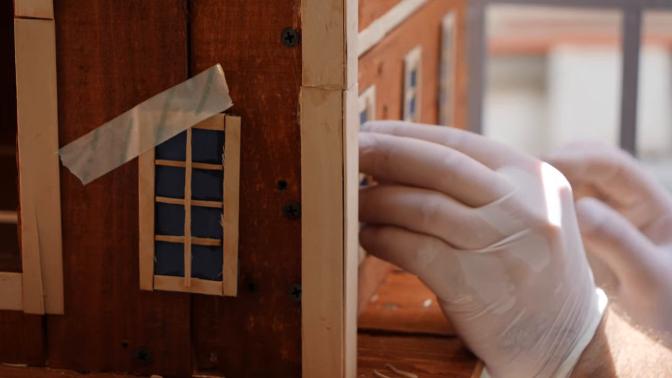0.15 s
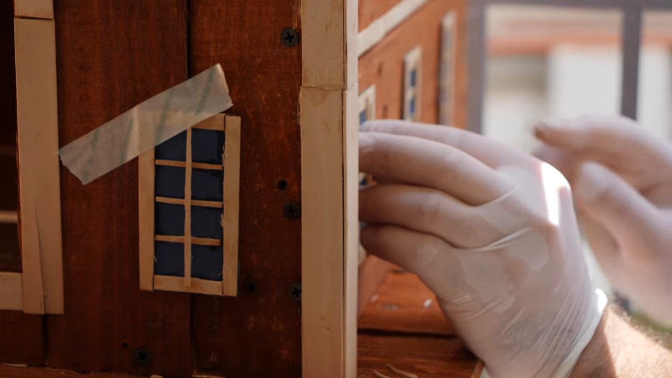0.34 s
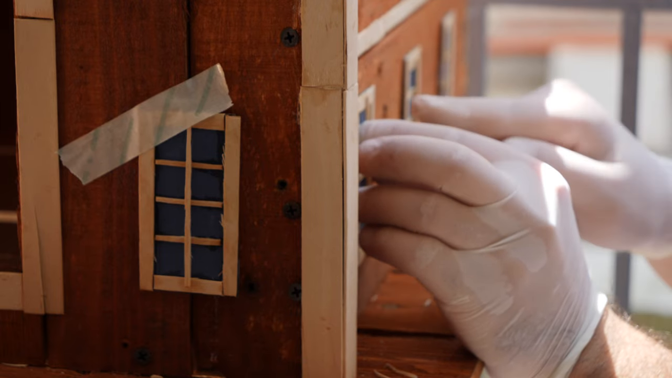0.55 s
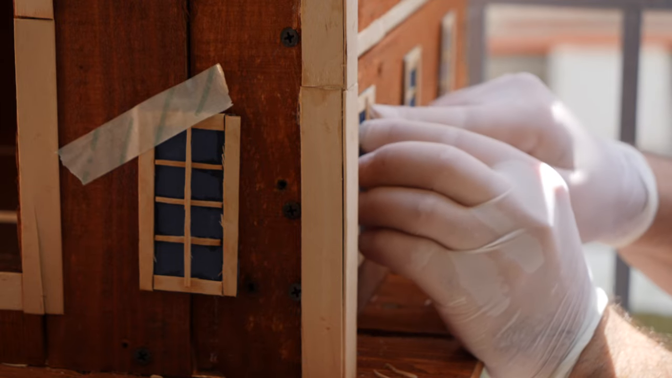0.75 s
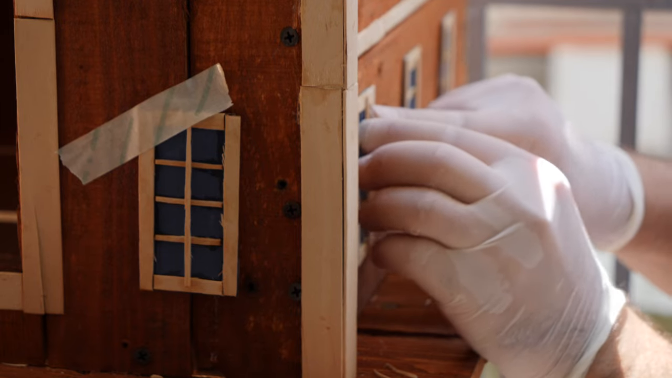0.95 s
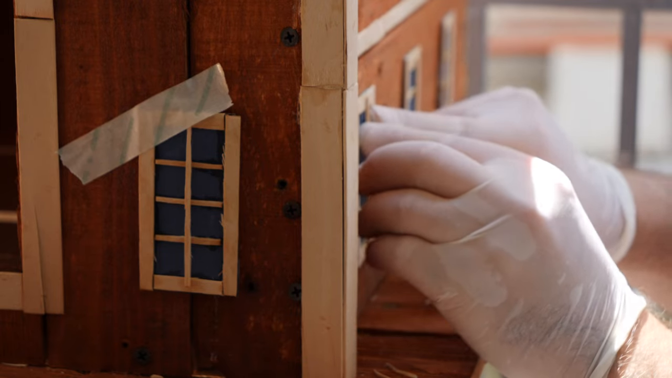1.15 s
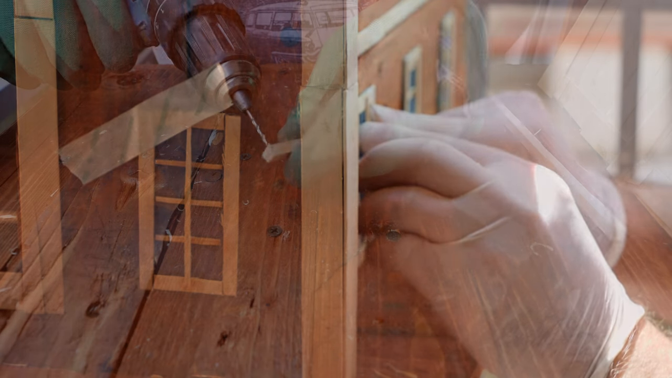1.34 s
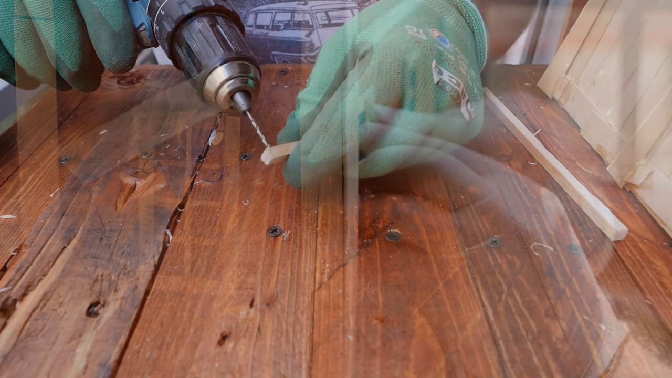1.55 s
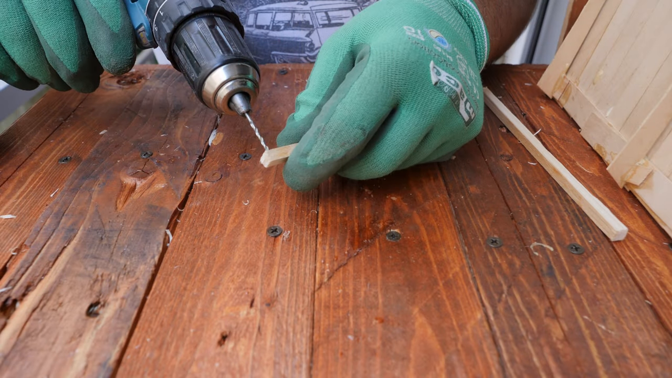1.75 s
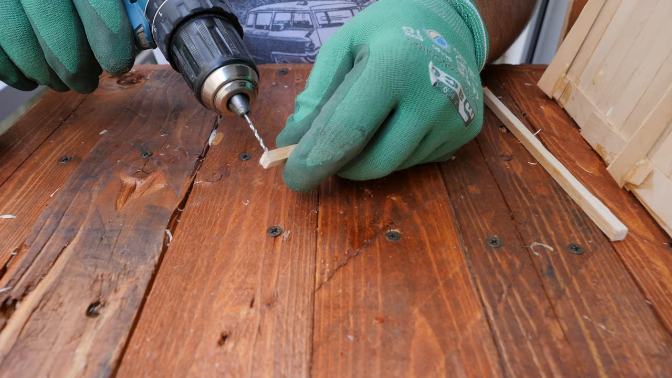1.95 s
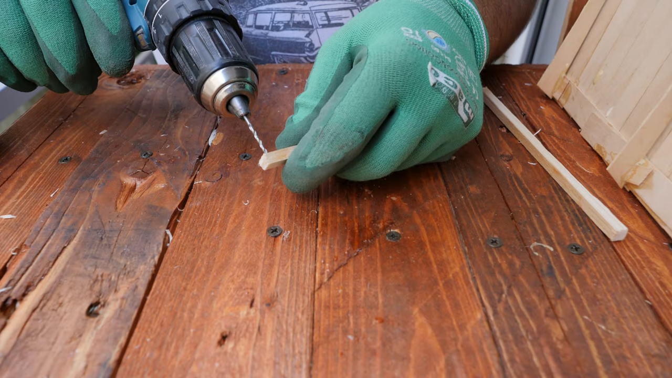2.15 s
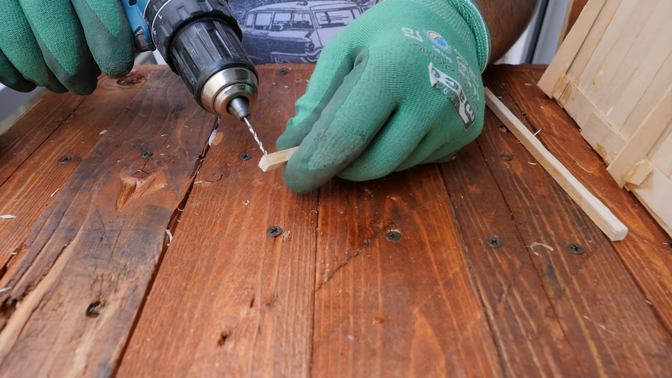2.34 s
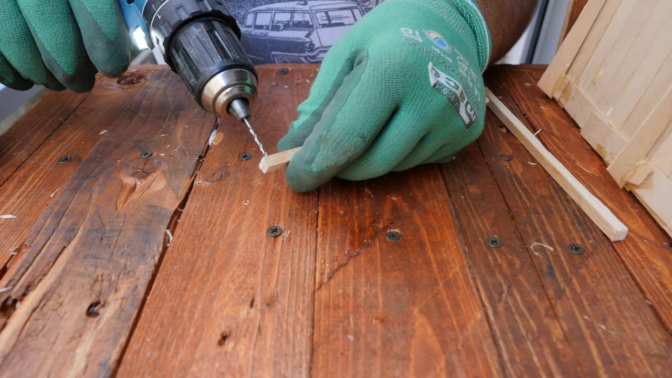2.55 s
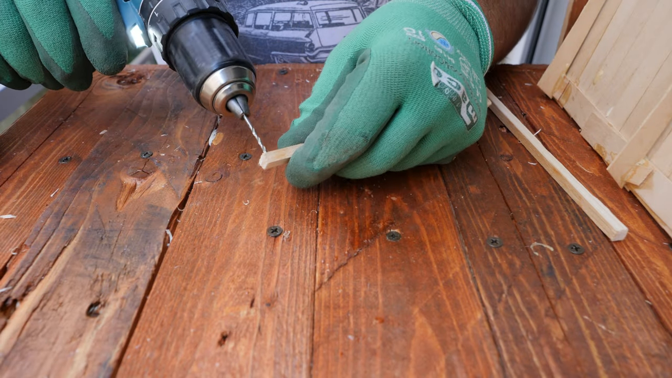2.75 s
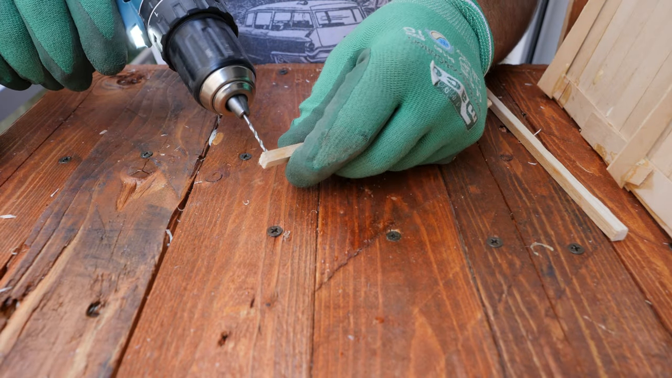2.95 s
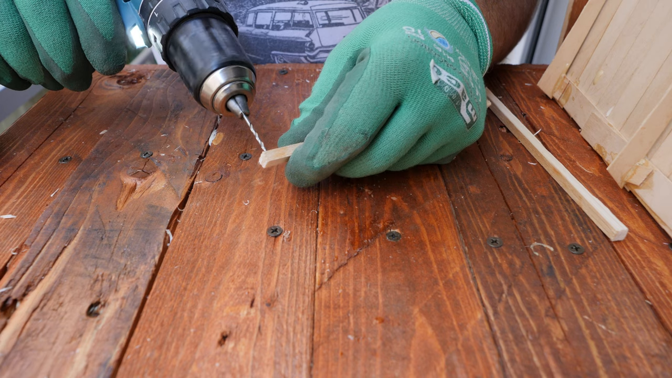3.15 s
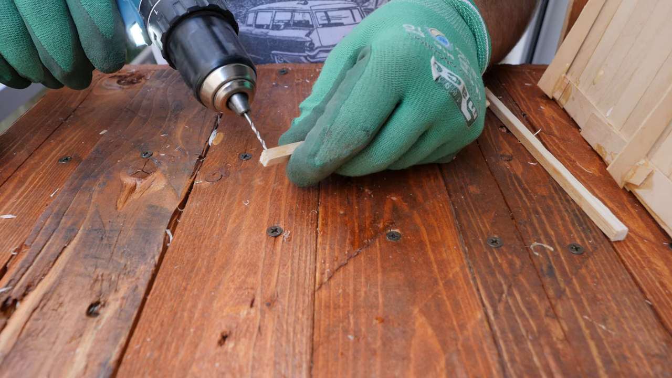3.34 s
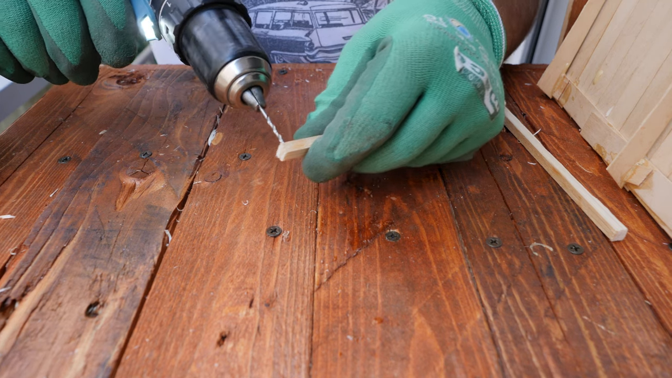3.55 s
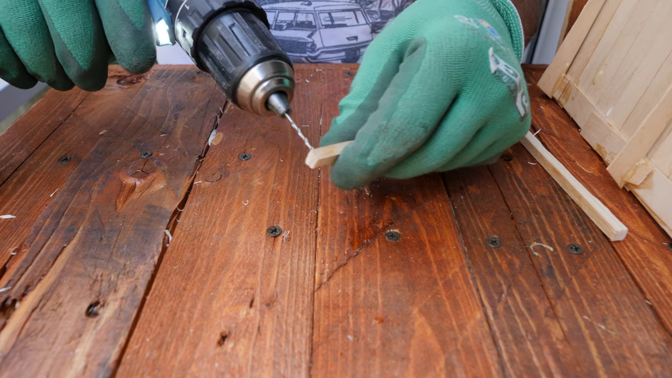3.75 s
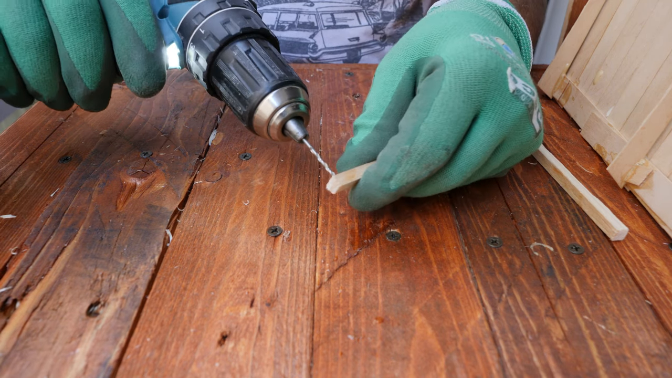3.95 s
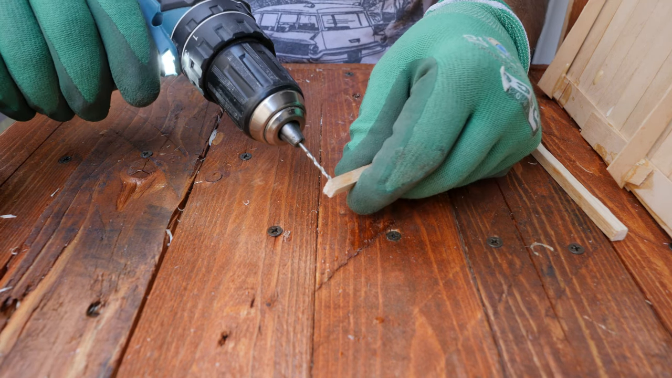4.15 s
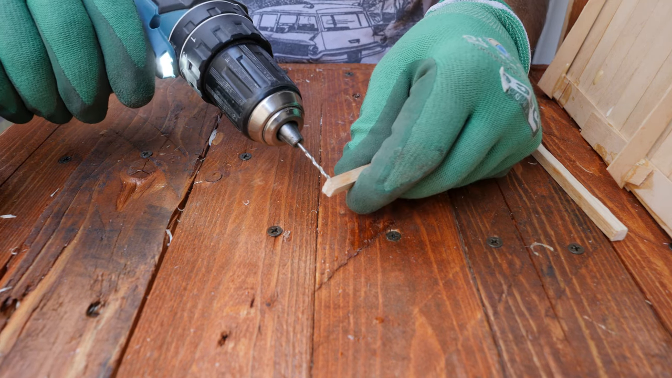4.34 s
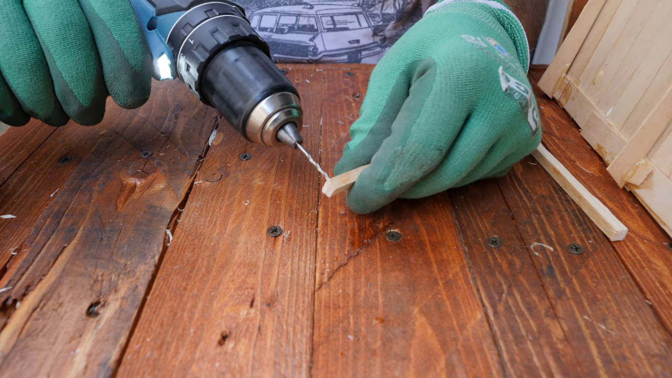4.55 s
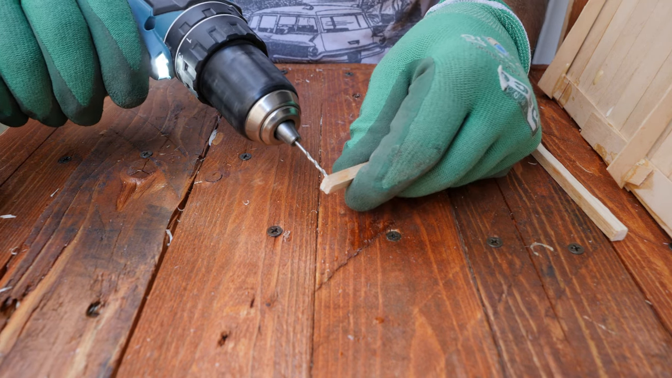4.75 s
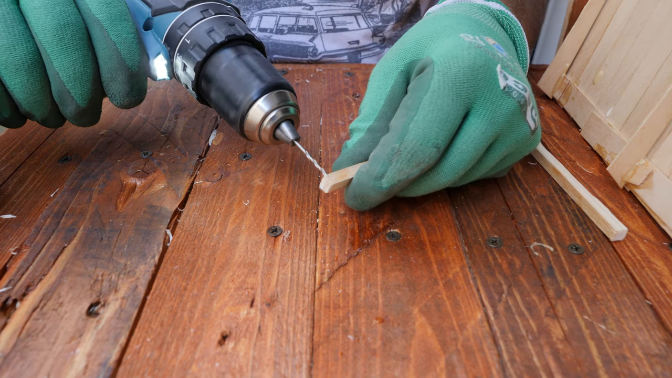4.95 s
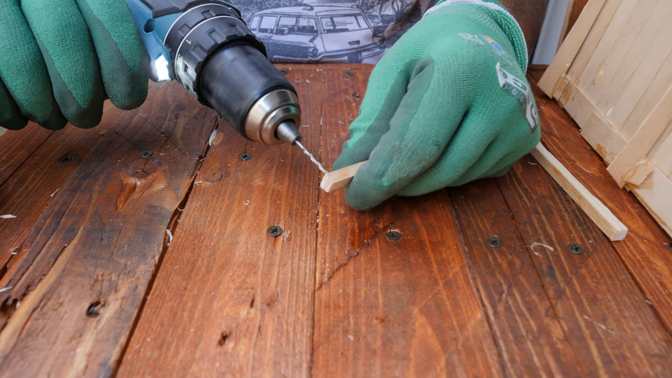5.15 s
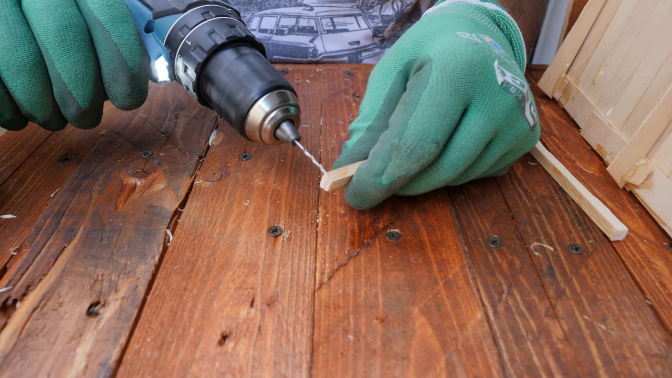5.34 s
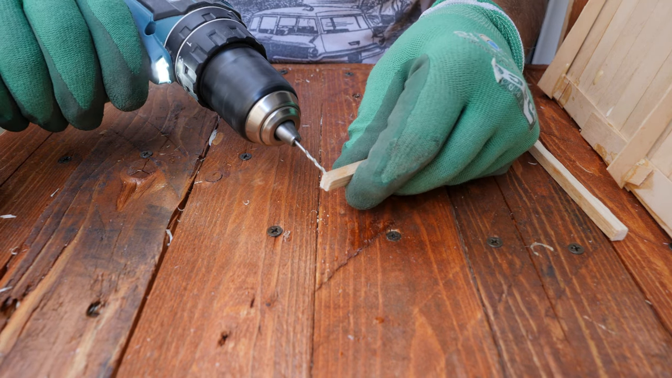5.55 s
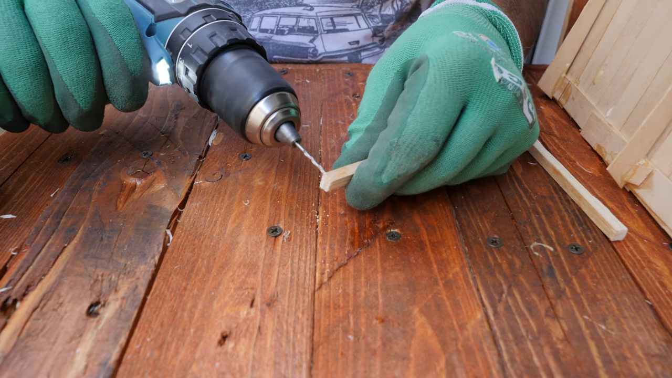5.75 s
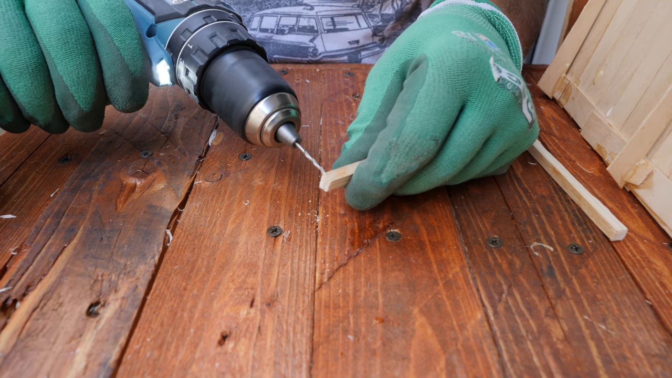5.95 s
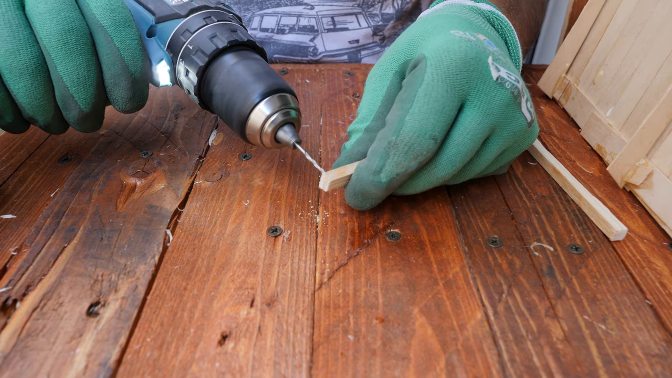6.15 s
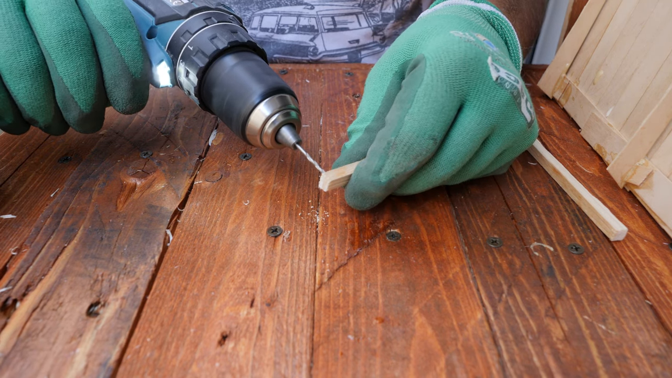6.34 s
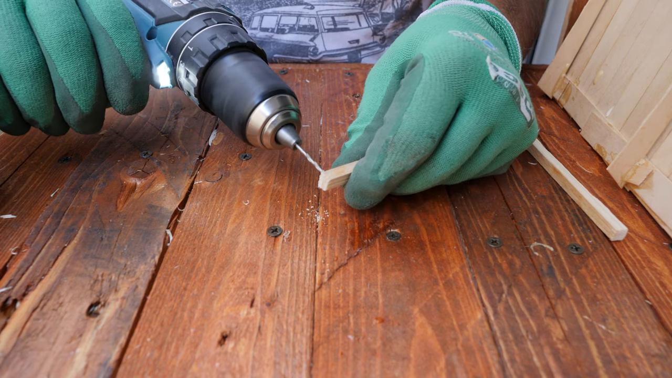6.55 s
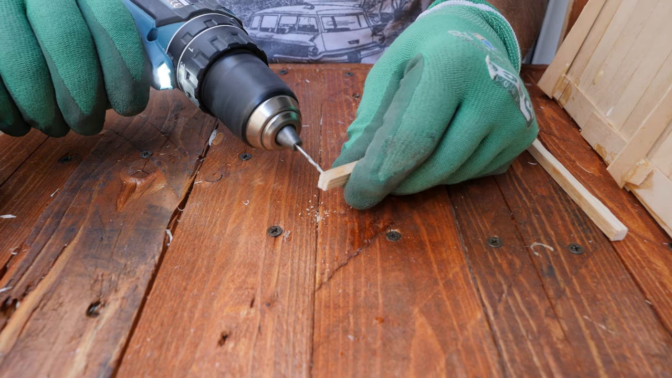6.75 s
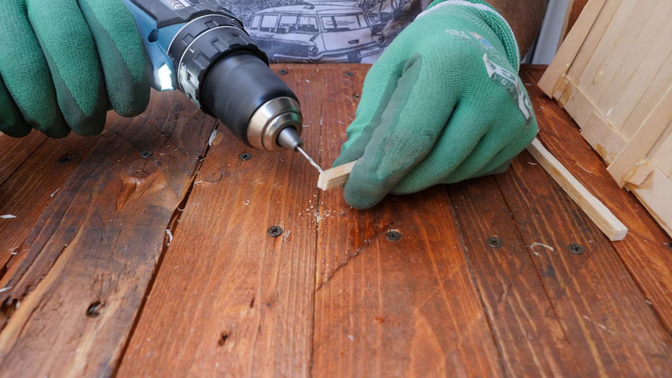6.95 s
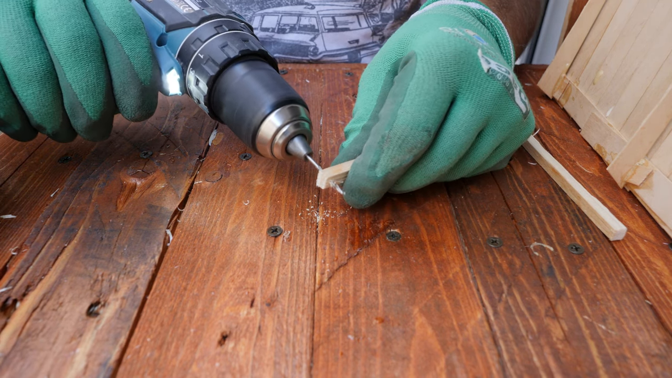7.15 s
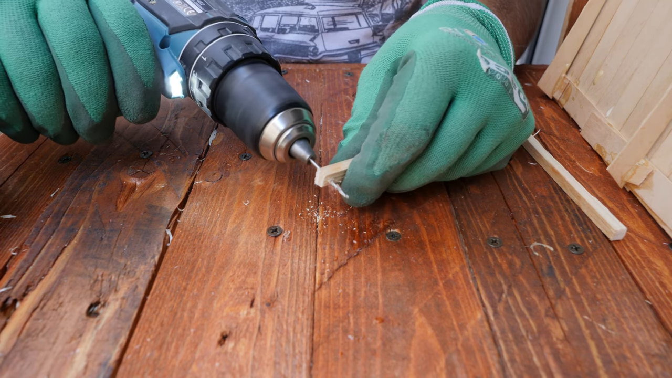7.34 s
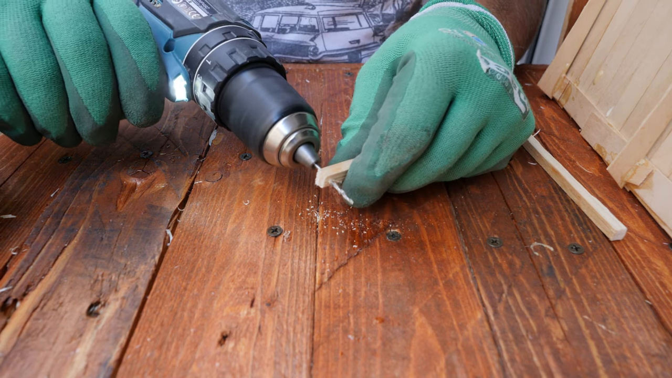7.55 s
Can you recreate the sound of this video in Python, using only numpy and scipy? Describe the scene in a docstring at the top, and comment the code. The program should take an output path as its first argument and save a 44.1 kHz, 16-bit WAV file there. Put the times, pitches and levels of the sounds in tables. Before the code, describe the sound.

Soft finger taps in a quiet room, then louder humming air and two close drill bursts, the second climbing to a shrill, rattling full-speed whine.

```python
"""A cordless drill, close and near the centre, bores a thin wooden stick on a plank table: one slow pull, then a
second that steps up to full speed. Current pulses ring the motor can, shaft-locked tones make the whine, brush
catches and hiss the rasp, and noise bursts the rattle, all steered by one curve of shaft speed.
Filtered pushes and noise bursts make thumps on the wood, fingers tapping and clicks of the tool. Behind them, shaped
noise makes a quiet room that gives way to a louder one with a low hum; scattered phases spread it in stereo."""
import sys
import numpy as np
from scipy import signal
from scipy.fft import rfft, irfft
from scipy.io import wavfile
from scipy.ndimage import uniform_filter1d

SR = 44100
rng = np.random.default_rng(int(sys.argv[2]) if len(sys.argv) > 2 else 0)


def generate_wav(sig):
    """Save sig (samples, or channels by samples) to the path in sys.argv[1] as 16-bit PCM at SR."""
    pcm = np.round(np.clip(np.atleast_2d(sig).T, -1, 1) * 32767).astype(np.int16)
    wavfile.write(sys.argv[1], SR, pcm)


N = 334719
T = np.arange(N) / SR  # seconds
FREQ = np.fft.rfftfreq(N, 1 / SR) + 1e-3  # Hz, kept above zero for the logarithms
TOP_HZ = 15750

# Air of the quiet room. Each row: frequency in Hz, outline of the noise in dB per Hz.
QUIET_AIR = [(25, -84), (55, -81), (90, -14), (140, -45), (280, -16), (480, -29), (1200, -26),
             (2400, -39.5), (4000, -28), (6200, -43), (11000, -44), (13000, -55), (15000, -75)]
# Air of the louder room. Each row: frequency in Hz, outline of the noise in dB per Hz.
LOUD_AIR = [(18, -69), (30, -41), (53, -45), (73, -30), (139, -23), (205, -11.5), (274, -4.5), (437, -9),
            (485, -5.5), (881, -9.5), (1090, -8.5), (2370, -14.5), (6200, -34), (13500, -43.5),
            (15000, -44)]
QUIET_DB, LOUD_DB, HUM_DB, WHISTLE_DB = -69.5, -49, -57.5, -84  # rms levels before the rooms are mixed
# The louder room comes in. Each row: time in seconds, share of its amplitude [0 to 1].
LOUD_ROOM_SHARE = [(1.24, 0.27), (1.5, 0.73), (1.75, 1)]
# Low hum of the louder room. Each row: frequency in Hz, outline in dB per Hz.
HUM = [(60, -41), (92, -15.5), (110, -21), (128, -6.5), (141, 1), (160, -7), (210, -20), (1000, -88)]
# Faint electronic whistle of the louder room. Each row: frequency in Hz, outline in dB per Hz.
WHISTLE = [(12000, -59), (12950, -20), (13103, -5), (13250, -13), (14000, -70)]
# Faint far-off tone in the quiet room. Each row: time in seconds, peak level in dB before the rooms are mixed.
FAR_TONE_LEVEL = [(0.24, -100), (0.3, -63), (0.64, -62.5), (0.74, -100)]
FAR_TONE_HZ = 576

# Stereo width by frequency. Each row: frequency in Hz, side against mid in dB.
STEREO_WIDTH = [(60, -32), (130, -26), (300, -26), (600, -19), (1200, -15.5), (2300, -13), (3300, -15),
                (5000, -18), (7000, -32), (10200, -32), (11400, -11), (13000, -7)]
# The tool's lean to the left. Each row: frequency in Hz, side share [ratio; negative leans right].
LEFT_LEAN = [(300, 0.01), (1000, 0.06), (2000, 0.085), (4000, 0.03), (9000, 0.0), (12000, -0.05)]

# Fingers on light wooden parts. Each row: start in seconds, peak in dB, frequency in Hz above which it fades.
FINGER_TAPS = [(0.288, -49, 220), (0.33, -52, 350), (0.368, -48, 520), (0.504, -45.5, 330),
               (0.688, -50, 210), (1.08, -54, 220), (1.162, -50, 190)]
TAP_DECAY_S, TAP_LOW_HZ = 0.0065, 119
# Thumps on the wood: soft bumps, one firm knock, and the table thumping as the drill surges.
# Each row: start in seconds, peak in dB, frequency in Hz above which the push fades.
WOOD_THUMPS = [(2.016, -53, 60.4), (2.163, -52, 70), (2.732, -32, 251), (3.382, -39, 150),
               (4.1756, -19.5, 760), (4.178, -25.5, 260), (4.1863, -29.5, 450), (4.193, -29, 500),
               (4.229, -38, 402), (4.262, -33.5, 130), (4.288, -50, 200), (4.561, -37, 150)]
# Resonances of the plank table. Each row: frequency in Hz, width in Hz, gain in dB.
TABLE_MODES = [(150, 22, 12), (240, 13.4, 20.5), (260, 16, 11), (400, 180, 4), (480, 57, 7), (645, 55, 2),
               (726, 39, -12), (904, 50, -4), (1329, 90, -4), (1590, 160, -8)]
# The trigger closes, the gears take up play, or the drill is jolted as it touches down.
# Each row: start in seconds, relative level in dB, frequency in Hz above which it fades.
TOOL_CLICKS = [(2.694, -23, 9000), (2.713, -27, 7000), (2.722, -28, 7000), (4.174, -25, 1700),
               (4.523, -33, 11000)]
CLICK_DECAY_S = 0.0065
# Colour of a crack. Each row: frequency in Hz, outline in dB per Hz.
CRACK = [(200, -2), (1000, 7.5), (3000, 3), (5000, -2.5), (9000, -8), (15000, -18)]

# The two pulls of the trigger. Each row: start in seconds, stop in seconds, whine trim in dB.
TRIGGER_PULLS = [(2.694, 3.755, -0.5), (4.523, 7.6, -3.5)]
# The trigger is squeezed in stages, eased off and let go; in the second pull the bit bites, then breaks through.
# Each row: time in seconds, shaft speed in turns per second.
SHAFT_SPEED = [(2.68, 1), (2.73, 62), (2.78, 65), (3.025, 65), (3.085, 76), (3.125, 87), (3.185, 110),
               (3.24, 110.3), (3.31, 107.5), (3.38, 124), (3.56, 123.7), (3.605, 121), (3.66, 107.7),
               (3.745, 84), (3.85, 1), (4.51, 1), (4.56, 66), (4.62, 105), (4.66, 118), (4.71, 124),
               (4.995, 123), (5.04, 142), (5.09, 169), (5.14, 195), (5.24, 206), (5.635, 205.4),
               (5.70, 236), (5.75, 268), (5.78, 295), (5.824, 319), (5.884, 332), (6.0, 343), (6.18, 349.9),
               (6.42, 342.8), (6.556, 346.6), (7.0, 344), (7.06, 360), (7.14, 368), (7.43, 370.5)]
INERTIA_S, ATTACK_S, BRAKE_S = .025, .0062, .02  # speed smoothing; rise and 1/e fall of a pull's loudness
SURGE_TURNS_PER_S2, COAST_TURNS_PER_S2 = 280, 320  # speeding up and slowing down at full effect
# Loudness against speed; the chopping all but ends at full trigger.
# Each row: shaft speed in turns per second, motor level in dB, gear rattle in dB, buzz in dB.
LEVELS_BY_SPEED = [(10.1, -57, -89, -35), (45.5, -52, -51, -48), (61, -40, -49.5, -40),
                   (131.5, -35, -58, -41), (238, -29.5, -36.5, -53), (296, -25.5, -31.5, -63),
                   (344, -25, -26, -78), (359, -24, -24.5, -83)]
SURGE_BUZZ_DB = -2.5
RUMBLE_DB, SURGE_DB = -54.5, -49  # steady table rumble while the drill runs, and what full torque adds

# The bit scrapes as it bites into the stick. Each row: time in seconds, mean level in dB.
BITE_LEVEL = [(5.05, -91), (5.16, -40.5), (5.26, -42.5), (5.4, -44.5), (5.75, -42), (6.0, -75)]
# The stick rings with the scrape. Each row: frequency in Hz, width in Hz, gain in dB.
STICK_MODES = [(695, 220, -2), (800, 360, 0)]
# Loose gear teeth. Each row: frequency in Hz, outline of the rattle in dB per Hz.
RATTLE_COLOUR = [(150, -62), (500, -40), (900, -16.5), (1050, 0), (1300, 7), (1600, 4.5), (1950, 2.5),
                 (2600, -4.5), (3050, -21), (4100, -12.5), (4700, -44), (7000, -33), (12000, -54)]
# Narrow gearbox resonances. Each row: frequency in Hz, width in Hz, gain in dB.
GEARBOX_MODES = [(1050, 20, -12), (1270, 73, -14), (1350, 52, -16.5), (1460, 130, -22), (2183, 37, -8),
                 (2464, 47, -13), (2590, 150, -17.5), (4083, 30, -6)]

CHOP_HZ, CHOP_START_S = 113.95, .0014
# What each current pulse rings in the motor can. Each row: frequency in Hz, width in Hz, gain in dB.
MOTOR_CAN_MODES = [(226, 6.9, 10.5), (957, 250, 27), (1290, 100, 21), (1364, 200, 20)]
# Colour of the buzz. Each row: frequency in Hz, outline in dB.
BUZZ_COLOUR = [(50, -40), (110, -11), (220, 1), (750, -12), (1100, -8), (1600, -7), (2000, -12),
               (2800, -24), (5000, -36)]
# What catching brushes ring in the motor's shell. Each row: frequency in Hz, outline in dB per Hz.
SHELL_COLOUR = [(300, -14), (700, 1), (1500, -3), (2150, -4), (2480, -2), (2620, 6), (2780, -2), (3050, -2),
                (3400, 7), (3750, 7), (4050, 1), (4400, 7), (4850, -3), (5150, 7), (5550, 2.5), (5950, -2),
                (6700, 6), (7150, 2), (7500, 6.5), (8150, 1), (8850, 8), (9700, 2), (11000, -9),
                (12400, -1), (13600, -6), (15800, -17)]
# Sliding hiss of the brushes. Each row: frequency in Hz, outline in dB per Hz.
HISS_COLOUR = [(300, -13), (700, 0.5), (1500, 3.5), (2600, 4), (3600, 5.5), (4500, 6), (5200, 4), (6100, 2),
               (7000, 5.5), (7700, 3.5), (9100, 8), (10300, 2), (13500, -3.5), (15800, -10)]
# Whine lines: shaft 1, fan 3, ten commutator segments and their overtones, gear mesh 23, and sidebands.
# Each row: multiple of the shaft rate, level in dB against the rasp, best speed in turns per second,
# octaves away from that speed at which the line is 6 dB weaker.
WHINE_LINES = [(1, -25, 375, .25), (1, -19, 230, .25), (2, -21, 345, .3), (3, -11, 345, .3),
               (4, -9, 260, .14), (5, -17, 205, .25), (10, -9.5, 100, .7), (10, -11, 205, .3),
               (10, -6.5, 316, .11), (10, -11.5, 375, .15), (11, -11.5, 372, .2), (12, -14.5, 345, .2),
               (18, -19, 205, .6), (20, -8.5, 305, .35), (20, -10, 195, .25), (22, -15, 205, .25),
               (23, -10, 152, .13), (23, -5.8, 205, .22), (23, -1, 368, .26), (28, -15.5, 124, .2),
               (29, -21, 120, .4), (30, -10.5, 105, .6), (30, -9, 182, .2), (30, -9.5, 320, .4),
               (31, -19, 118, .4), (32, -10.5, 205, .25), (32, -7.5, 345, .25), (40, -9.5, 63, .25),
               (40, -9, 235, .45), (41, -18, 124, .15), (42, -18, 124, .15), (50, -12, 106, .25),
               (50, -8, 200, .4), (56, -15, 65, .3), (60, -9.5, 132, .8), (61, -13, 123, .15),
               (64, -8, 205, .3), (80, -10.5, 115, .55), (81, -11, 124, .2), (90, -11, 110, .2)]
# The housing colours whatever line crosses it. Each row: frequency in Hz, gain in dB.
HOUSING_GAIN = [(650, 1), (850, 2), (1030, 4), (1130, 2), (1240, -5), (1700, -6), (1950, -1), (2070, 0),
                (2200, -1), (2450, -3), (2600, 2), (2750, 1), (2950, 4), (3200, 8), (3480, 7), (3720, 4),
                (3900, 2), (4100, 2), (4400, -1), (4730, 1), (4950, -5), (5180, 4), (5480, 3), (5850, 0),
                (6200, -6), (6580, 3), (6950, -2), (7250, -2), (7480, 3), (7900, 0), (8500, 1.5),
                (10000, 0), (11000, -3), (13000, -1), (15000, -10)]
SWAY_DB, FLUTTER_DB = 1.8, 2.1  # slow and fast spread of each whine line's level
COAST_TREBLE_DB = -9


def undb(db):
    """Decibels to gain."""
    return 10 ** (np.asarray(db) / 20)


def unit(x):
    """Scale to rms 1."""
    return x / np.sqrt(np.mean(x ** 2))


def noise():
    """White noise."""
    return rng.standard_normal(N)


def walk(rate):
    """Random wander with a spread near 1: straight lines between `rate` chance values a second."""
    knots = rng.standard_normal(4096)
    return 1.2 * np.interp(T * rate, np.arange(4096), knots)


def curve(rows):
    """The second column of a table, joined by straight lines in time."""
    seconds, values = np.transpose(rows)
    return np.interp(T, seconds, values)


def response(points, hz):
    """Gain of a (Hz, dB) outline at the given frequencies."""
    f, db = np.transpose(points)
    return undb(np.interp(np.log(hz), np.log(f), db))


def colour(x, points):
    """Filter by an outline; rms 1."""
    return unit(irfft(rfft(x) * response(points, FREQ), N))


def ring(x, modes):
    """Drive a set of damped resonances."""
    gain = 0
    for f, width, db in modes:
        gain = gain + undb(db) / (1 + 1j * (FREQ ** 2 - f ** 2) / (FREQ * width))
    return irfft(rfft(x) * gain, N)


def butter(x, order, hz, kind):
    """Butterworth filter."""
    return signal.sosfilt(signal.butter(order, hz, kind, fs=SR, output="sos"), x)


def ticks(times, sizes):
    """Impulses, each shared between two neighbouring samples."""
    i, part = np.divmod(np.clip(times * SR, 0, N - 2), 1)
    i = i.astype(int)
    return np.bincount(i, sizes * (1 - part), N) + np.bincount(i + 1, sizes * part, N)


def add_thud(out, start_s, peak_db, thud):
    """Lay one thud into the track at its peak level."""
    out[int(start_s * SR):][:len(thud)] += undb(peak_db) * thud / np.abs(thud).max()


def background():
    """Room air as shaped noise; the louder room has a wavering low hum and a faint electronic whistle."""
    share = curve(LOUD_ROOM_SHARE)
    air = undb(LOUD_DB) * colour(noise(), LOUD_AIR)
    hum = undb(HUM_DB) * colour(noise(), HUM)
    whistle = undb(WHISTLE_DB) * colour(noise(), WHISTLE)
    far_phase = 2 * np.pi * FAR_TONE_HZ * T + .5 * walk(24.8)
    far_tone = undb(curve(FAR_TONE_LEVEL)) * np.sin(far_phase)
    quiet = undb(QUIET_DB) * colour(noise(), QUIET_AIR) + far_tone
    return share * (air + hum + whistle) + (1 - share) * quiet


def taps():
    """Fingertips on light wood: short band-limited noise bursts, dull thuds that hardly ring."""
    out = np.zeros(N)
    age = T[:SR // 8]
    for s, db, top_hz in FINGER_TAPS:
        press = rng.standard_normal(len(age)) * np.exp(-age / TAP_DECAY_S)
        thud = butter(press, 2, [min(TAP_LOW_HZ, top_hz / 2), top_hz], "band")
        add_thud(out, s, db, thud)
    return out


def thumps():
    """Soft or firm pushes, each with a short scuff, ring the table; the planks radiate little deep bass."""
    scuff = .05 * noise() * np.exp(-T / .015)
    push = ticks(np.zeros(1), np.ones(1)) + scuff
    blow = butter(ring(push, TABLE_MODES)[:SR // 4], 4, 195, "high")
    out = np.zeros(N)
    for s, db, soft_hz in WOOD_THUMPS:
        add_thud(out, s, db, butter(blow, 2, soft_hz, "low"))
    return out


def clicks():
    """Short decaying cracks: bright in the plastic shell, dull against the wood."""
    crack = colour(noise(), CRACK)
    out = 0
    for s, db, top_hz in TOOL_CLICKS:
        decay = (T >= s) * np.exp(-np.abs(T - s) / CLICK_DECAY_S)
        burst = .5 * undb(db) * decay * crack
        out = out + butter(burst, 2, [300, min(top_hz, TOP_HZ)], "band")
    return out


def table_rumble(torque):
    """The table rumbles a little while the drill runs, and more while torque speeds the shaft up."""
    return (undb(RUMBLE_DB) + undb(SURGE_DB) * torque) * unit(ring(noise(), TABLE_MODES))


def stick_scrape():
    """Scraping noise of the bit rings the thin stick, its level wandering by about 2 dB."""
    return undb(curve(BITE_LEVEL) + 2 * walk(60)) * unit(ring(noise(), STICK_MODES))


def gears():
    """Loose teeth rattle in the gearbox, in quick uneven spurts."""
    knocks = noise() * undb(1.8 * walk(520) + .6 * walk(70))
    return unit(colour(knocks, RATTLE_COLOUR) + 0.81 * unit(ring(knocks, GEARBOX_MODES)))


def chopper():
    """Current pulses at a fixed rate kick the motor can, whatever the speed."""
    times = np.arange(CHOP_START_S, T[-1], 1 / CHOP_HZ)
    kicks = ticks(times, undb(0.9 * rng.standard_normal(len(times))))
    return colour(ring(kicks, MOTOR_CAN_MODES), BUZZ_COLOUR)


def brushes(shaft_hz, turns, buzz, count=80):
    """Brushes catch on the same rough spots every turn and ring the shell; at speed a sliding hiss takes over."""
    angles, roughness = rng.random(count), rng.standard_normal(count)
    passes = (np.arange(int(turns[-1]))[:, None] + angles).ravel()
    # each spot keeps its roughness, but no two passes are quite alike
    sizes = np.resize(roughness, len(passes)) + .9 * rng.standard_normal(len(passes))
    # more catches a second, each made weaker
    catches = ticks(np.interp(passes, turns, T), sizes) / np.sqrt(shaft_hz)
    catches = colour(butter(catches, 1, 800, "high"), SHELL_COLOUR)
    hiss = colour(noise(), HISS_COLOUR)
    catch_share = np.interp(shaft_hz, [65, 120, 205, 330], [.85, .65, .4, .12])
    # they spark harder in step with each current pulse
    pulse = np.cos(2 * np.pi * CHOP_HZ * (T - CHOP_START_S))
    sparking = 1 + 0.1 * buzz / buzz.max() * pulse
    return (np.sqrt(catch_share) * catches + np.sqrt(1 - catch_share) * hiss) * sparking


def whine(shaft_hz, turns, coast):
    """Commutator, fan and gear-mesh lines follow the shaft through the housing's resonances; each flutters."""
    # a slow motor turns unevenly, which smears its high lines most
    uneven = np.interp(shaft_hz, [65, 120, 300], [.012, .008, .004]) * walk(160)
    out = 0
    for order, db, best_hz, octaves in WHINE_LINES:
        hz = order * shaft_hz
        detuned = np.log2(shaft_hz / best_hz) / octaves
        level_db = db - 6 * detuned ** 2 + SWAY_DB * walk(30) + FLUTTER_DB * walk(260)
        # a coasting motor is unloaded and loses its high lines
        level_db = level_db + COAST_TREBLE_DB * coast * np.interp(hz, [3500, 5000], [0, 1])
        gain = undb(level_db) * response(HOUSING_GAIN, hz) * (hz < TOP_HZ)
        phase = 2 * np.pi * order * turns + order * uneven + .3 * walk(70)
        out = out + gain * np.sin(phase)
    return out


def trigger():
    """Shaft speed in turns per second; the motor's inertia rounds every change."""
    return uniform_filter1d(curve(SHAFT_SPEED), size=int(INERTIA_S * SR))


def drill():
    """Shaft speed sets the whine's pitches and the levels; each pull opens the sound, and release fades it fast."""
    speed_hz = trigger()
    running, whine_db = 0, 0
    for start, stop, trim_db in TRIGGER_PULLS:
        gate = np.clip((T - start) / ATTACK_S, 0, 1) * np.exp(-np.maximum(T - stop, 0) / BRAKE_S)
        running = running + gate
        whine_db = whine_db + gate * trim_db
    acceleration = np.gradient(speed_hz) * SR
    torque = np.clip(acceleration / SURGE_TURNS_PER_S2, 0, 1)
    coast = np.clip(-acceleration / COAST_TURNS_PER_S2, 0, 1)
    shaft_hz = speed_hz * (1 + 0.00132 * walk(40))
    turns = np.cumsum(shaft_hz) / SR
    speeds, *levels = np.transpose(LEVELS_BY_SPEED)
    motor_db, rattle_db, buzz_db = (np.interp(speed_hz, speeds, db) for db in levels)
    buzz = undb(buzz_db + SURGE_BUZZ_DB * torque) * (1 - coast)
    rasp = undb(0.08) * brushes(shaft_hz, turns, buzz)
    motor = undb(motor_db) * (rasp + undb(whine_db) * whine(shaft_hz, turns, coast))
    rattle = undb(rattle_db) * gears()
    # so small a tool radiates no deep bass
    body = butter(motor + rattle + table_rumble(torque) + stick_scrape(), 3, 150, "high")
    return running * (body + buzz * chopper())


def scene():
    """All is close and near the centre; a phase-scattered copy makes a small difference between left and right."""
    air = background()
    tool = drill() + clicks()
    mid = air + taps() + thumps() + tool
    age = T[:SR // 3]
    burst = rng.standard_normal(len(age)) * np.exp(-age / 0.045)
    # only the phases of the decaying burst are used
    scatter = np.exp(1j * np.angle(rfft(burst, N)))
    scattered_copy = rfft(mid) * scatter * response(STEREO_WIDTH, FREQ)
    lean = rfft(tool) * np.interp(FREQ, *np.transpose(LEFT_LEAN))
    side = irfft(scattered_copy + lean, N)
    # the louder room's air sits a little to the right, except in the bass
    bassless = signal.sosfiltfilt(signal.butter(1, 170, "high", fs=SR, output="sos"), air)
    side = side + bassless * (.03 - 0.18 * curve(LOUD_ROOM_SHARE))
    return mid + np.array([side, -side])


def record(dry):
    """A steep elliptic low-pass cuts the top."""
    return signal.sosfilt(signal.ellip(10, .2, 70, TOP_HZ, fs=SR, output="sos"), dry)


dry = scene()
out = record(dry)
generate_wav(out)
```